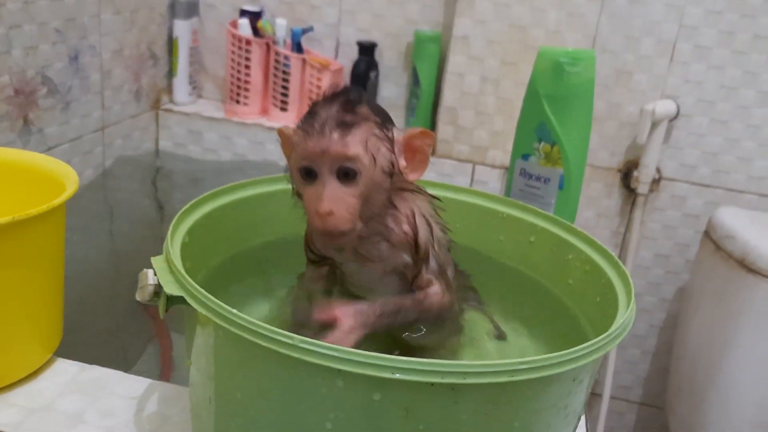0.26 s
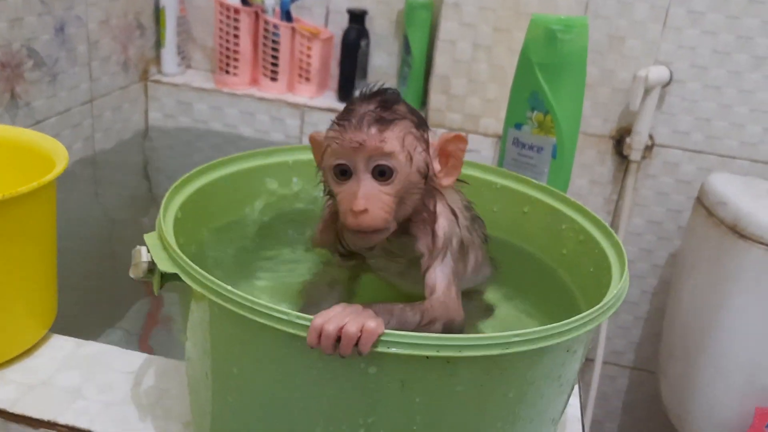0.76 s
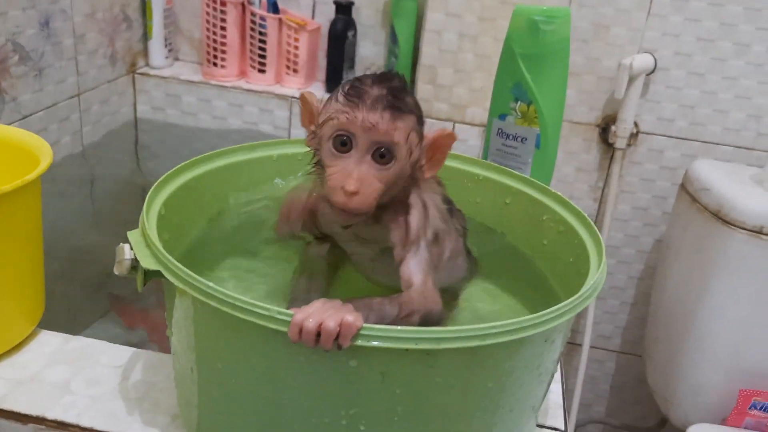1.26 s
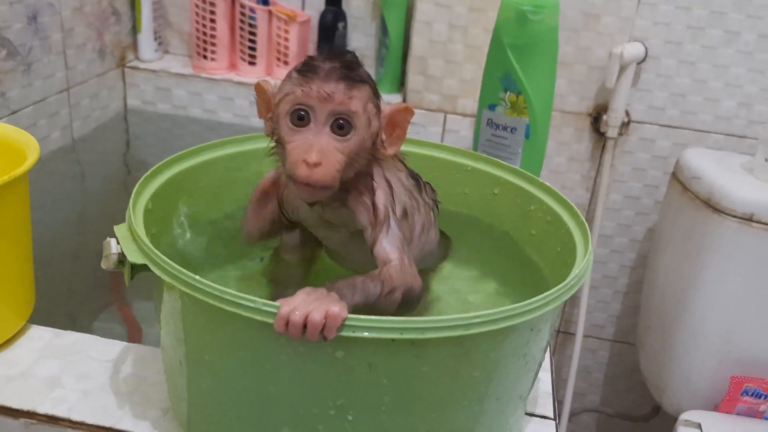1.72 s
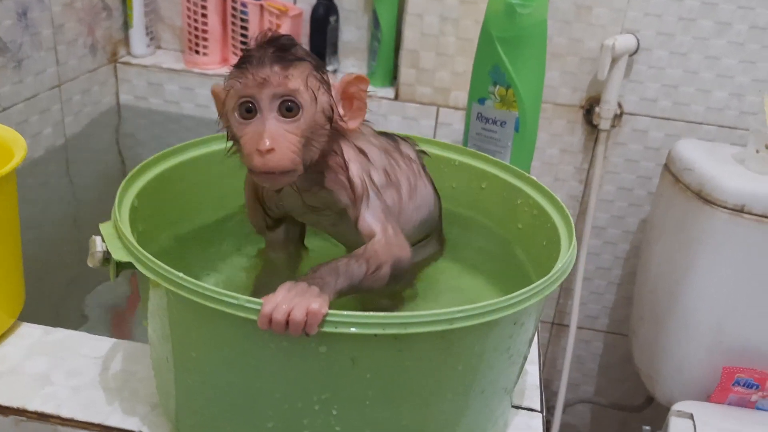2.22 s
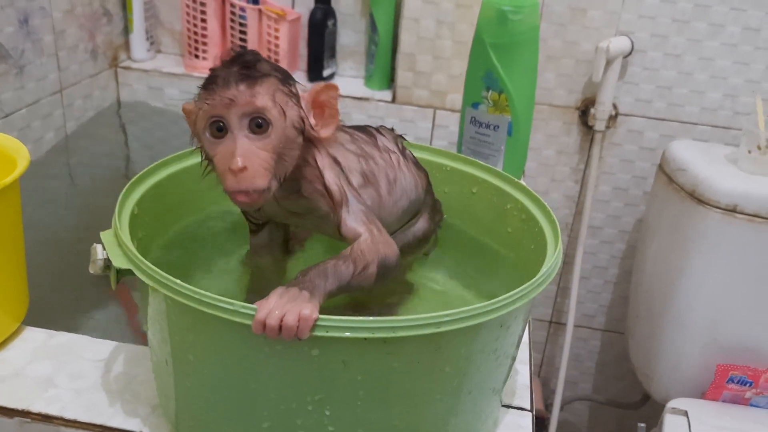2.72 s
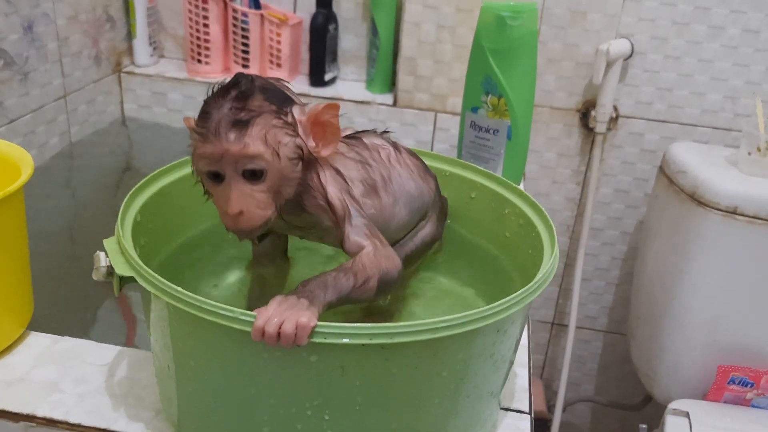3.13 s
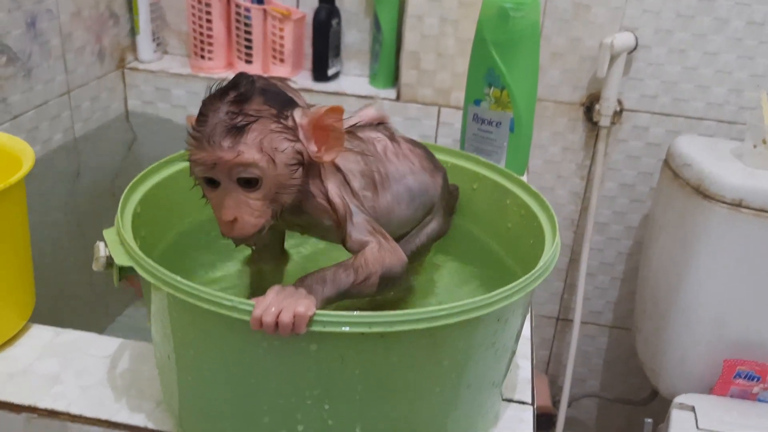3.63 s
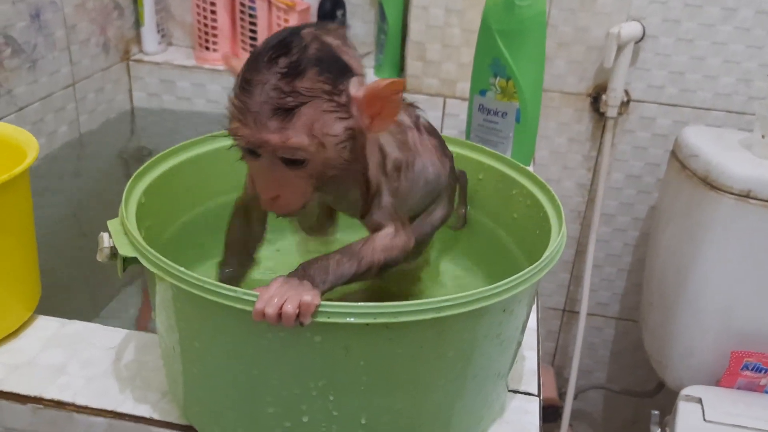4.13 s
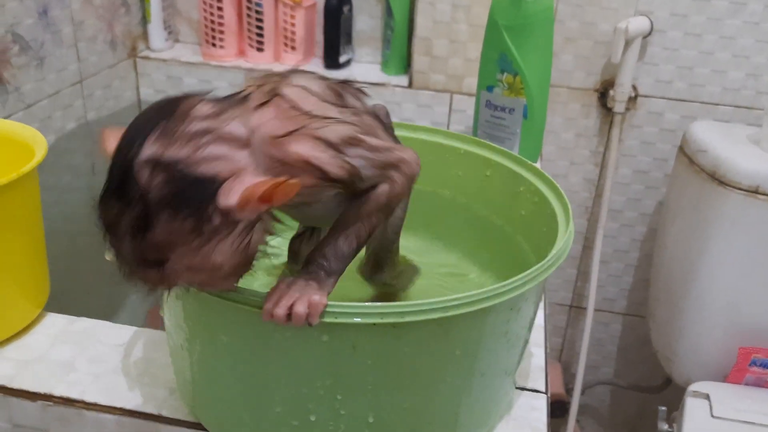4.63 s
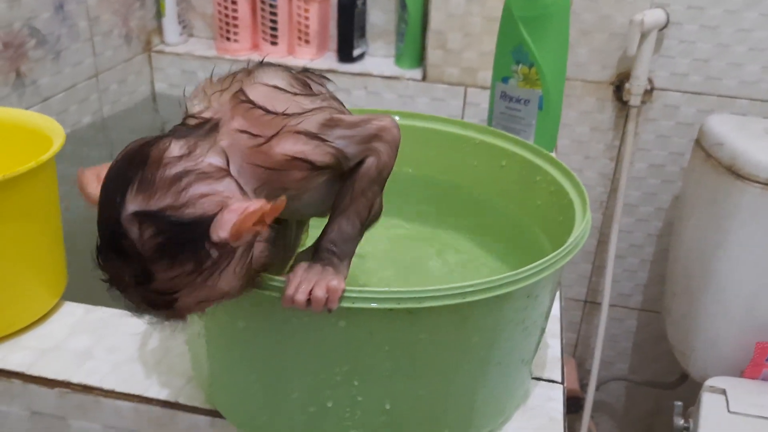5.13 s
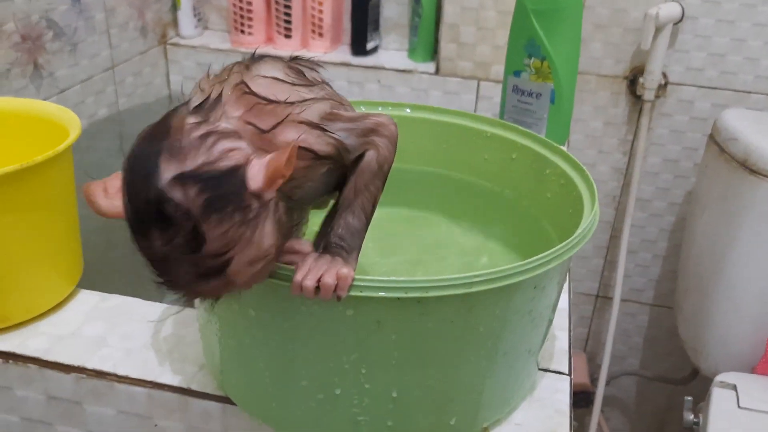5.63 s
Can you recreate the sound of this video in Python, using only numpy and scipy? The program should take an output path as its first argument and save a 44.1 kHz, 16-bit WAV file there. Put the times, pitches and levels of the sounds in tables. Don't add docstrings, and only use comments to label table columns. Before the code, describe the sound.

A small monkey moves in a plastic bucket of water. Strong swishing comes first, then bright bubble pops around one second, softer stirring and dribbles, a sharp wet slap just after four seconds, then near quiet with a very faint high squeak. Hard tiles echo; the microphone is fairly close, pops leaning left, over a low room hum.

```python
import sys
import numpy as np
from scipy import signal
from scipy.fft import irfft
from scipy.io import wavfile

SR = 44100
rng = np.random.default_rng(int(sys.argv[2]) if len(sys.argv) > 2 else 0)


def elevation(decibels):
    levels = np.asarray(decibels, float)
    return 10 ** (levels / 20)


def pcm_store(signal):
    levels = np.round(np.clip(np.atleast_2d(signal), -1, 1) * 32767)
    wavfile.write(sys.argv[1], SR, levels.astype(np.int16).T)


N = 258420

# start_s, rise_s, spray_db,
# fade_db_per_s, stir_depth_db
MOVES = [(-0.1, 0.16, -39.5, 35, -1), (0.03, 0.16, -37.5, 72, -1.5), (0.328, 0.097, -47, 97, -1),
         (0.558, 0.11, -52.5, 60, -4.5), (0.672, 0.011, -47, 25, 1.5), (0.7, .12, -41.5, 16.5, -1),
         (1.2, .11, -42.5, 25, -1.5), (1.38, 0.036, -46.5, 32, -0.5), (1.8, 0.13, -47.5, 50, 0),
         (1.97, 0.072, -49.5, 56, 2.5), (2.12, 0.092, -54.5, 70, 1.5), (2.685, 0.01, -54.5, 44, -4.5),
         (2.72, 0.043, -57, 74, 5), (2.87, 0.16, -56, 20, 1.5), (3.07, 0.17, -52, 44, 1.5),
         (3.36, .16, -50.5, 79, 2), (3.68, 0.061, -58, 50, 2.5), (3.91, 0.12, -53, 42, 1.5),
         (4.46, 0.12, -57, 48, -2.5), (4.9, .03, -59, 47, -0.5), (5.15, 0.15, -61.5, 93, -16),
         (5.46, .04, -65, 200, -3.5), (5.561, 0.04, -48, 72, 2), (5.82, 0.052, -66, 50, 7),
         (1.6, 0.12, -54.5, 23, 3),
    (2.25, 0.057, -56.5, 97, 1),
    (2.58, 0.085, -64, 20, -0.5),
    (4.12, 0.11, -54, 42, 4),
    (4.63, 0.073, -59, 110, -1.5),
    (4.8, .08, -66, 38, -3),
    (5.0, .06, -66, 50, -2),
]
# pitch_hz, level_db (per Hz)
SPRAY_COLOUR = [(210, -33), (350, -6.5), (622, -1.5), (779, -4), (1060, -2), (1280, -5), (1650, 1.5),
                (6530, -3), (9140, -7), (12200, -2.5), (16000, -20.5)]
# start_s, peak_db, pitch_hz, ring_ms, echo_share_db
POPS = [(0.623, -39.5, 3080, 4.3, -7), (0.679, -36, 1200, 9.4, 5.5), (1.109, -22.5, 2770, 18, -4.5),
        (1.185, -32, 2320, 13, -3), (1.315, -27, 1069, 50, 2), (1.319, -35.5, 1073, 100, -1),
        (1.986, -31, 2170, 9.2, -2.5), (2.043, -37.5, 1244, 20, -0.5), (2.687, -54.5, 1190, 16, 8),
        (2.738, -30.5, 3040, 21, -6), (2.897, -37.5, 1040, 14, 3), (3.023, -38.5, 3190, 12, 2.5),
        (4.113, -20, 1920, 10, 2.5), (4.113, -24.5, 3040, 14, -4), (4.526, -49, 2900, 9.9, 4.5),
        (4.707, -50.5, 1270, 20, 4.5), (4.913, -49.5, 2260, 9.8, 3), (5.169, -58, 2800, 12, 1),
        (5.567, -52, 1104, 5.7, 12), (5.719, -48, 1770, 11, 6), (1.9863, -32, 4000, 6.8, -1.5),
        (3.1287, -40, 6000, 6, 5), (5.7394, -45, 7550, 5.6, 4)]
# start_s, peak_db, pitch_hz, echo_share_db
SMALL_POPS = [(1.316, -34, 2310, 0), (1.318, -38, 1650, 0), (2.36, -42.5, 7500, 0.5),
              (2.0, -35.5, 1730, 3.5), (2.688, -45, 10000, -4), (2.35, -55.5, 1280, 0), (2.76, -55, 261, 7),
              (3.023, -45, 3750, 1.5), (3.239, -52.5, 462, 0), (4.113, -34.5, 1300, 2),
              (4.1139, -30, 1690, 2), (4.525, -53, 4000, 5), (4.535, -51, 1280, 3.5), (4.59, -54, 1290, 1),
              (4.745, -54.5, 1300, 4), (4.80, -65, 1270, 6), (4.905, -46, 12000, 4),
              (4.915, -53, 1640, 4.5), (5.087, -48, 11400, 2), (5.62, -52, 390, 4)]
# start_s, peak_db, pitch_hz, echo_share_db
GULPS = [(0.37, -37.5, 2000, 1), (0.4, -36.5, 1320, -2), (0.41, -39, 1490, -7.5), (0.69, -34, 1650, -3),
         (.698, -34, 1570, 3.5), (.71, -39, 980, 4), (4.914, -49, 2800, 0), (4.114, -38, 920, 1.5),
         (4.1145, -29, 1540, 4), (4.114, -37, 2370, 1), (1.108, -34, 2560, -2), (0.37, -42, 1600, -1),
         (0.67, -46, 1900, -4)]
# start_s, peak_db
TEARS = [
    (1.109, -25),
    (1.316, -32),
    (2.688, -46),
    (2.737, -47),
    (4.113, -24),
    (4.912, -52),
    (1.408, -40),
    (2.046, -43),
    (2.184, -48),
    (4.19, -32),
]
# pitch_hz, level_db (per Hz)
SLAP_COLOUR = [(290, -56), (500, -39), (831, -21), (1640, -13), (1840, -3.5), (2430, -18), (3810, -10.5),
               (4210, -26), (4600, -18), (6900, -10), (9090, -25), (13300, -18), (16000, -36)]
# crest_s, level_db, length_s
WAVES = [(0.035, -49, 0.19), (0.208, -47.5, 0.12), (0.36, -60, 0.072), (0.73, -71, 0.056),
         (0.832, -51.5, 0.082), (0.967, -60, 0.11), (1.09, -54, 0.079), (1.315, -58.5, 0.064),
         (1.49, -59.5, 0.12), (1.61, -59, 0.12), (1.82, -65.5, .12), (2.0, -50, 0.092), (2.14, -60, .08),
         (2.245, -62, 0.067), (2.81, -60.5, .07), (3.053, -61.5, 0.14), (3.25, -57.5, 0.072),
         (3.45, -59.5, 0.091), (3.626, -63.5, .1), (3.83, -67.5, .12), (4.12, -67, .12), (4.412, -68, .07),
         (4.73, -68, 0.084), (5.09, -70.5, 0.11), (5.623, -57.5, 0.091), (5.703, -60, 0.069)]
# pitch_hz, width_hz, level_db
BUCKET_AIR = [
    (313.7, 18.6, -0.5),
    (156, 59, -11),
    (385, 25, -8.5),
    (482, 210, -8),
]
# start_s, pitch_hz, level_db
SQUEAKS = [
    [(3.6, 10700, -98), (3.63, 10450, -70), (3.7, 10600, -73), (3.76, 10500, -77.5), (3.84, 10250, -71),
     (3.87, 10300, -95)],
    [(5.35, 11500, -96), (5.38, 12000, -75), (5.44, 13900, -73), (5.48, 15300, -73), (5.505, 15700, -73),
     (5.56, 14400, -74), (5.58, 14200, -95)],
    [(5.35, 9900, -88), (5.38, 10400, -78), (5.44, 11900, -75), (5.48, 12450, -71), (5.505, 12800, -71),
     (5.56, 12050, -75), (5.58, 11900, -95)],
]
# start_s, pitch_hz, level_db
THREAD = [
    (5.15, 2960, -95),
    (5.18, 2920, -75),
    (5.25, 3030, -71.5),
    (5.33, 3100, -68.5),
    (5.45, 3240, -92),
    (5.55, 3300, -95),
]
# pitch_hz, time_to_fall_60_db_s
TILES = [(200, .9), (1000, .7), (2000, .6), (3000, .55), (8000, .6), (15000, .55)]
# pitch_hz, likeness (1 = the same)
LIKENESS = [(60, 0.73), (100, 0.53), (180, 0.48), (310, 0.57), (550, 0.52), (950, 0.18), (1650, -0.098),
            (2860, 0.058), (4970, -0.088), (8640, -0.00025), (15000, -0.038)]
# pitch_hz, left_over_right_db
LEAN = [(60, 3.5), (100, 7.5), (180, 2.5), (310, 1), (550, 5.5), (950, 3), (1650, 3), (2860, 3.5),
        (4970, 0), (8640, 0), (15000, 4)]
# pitch_hz, level_db (per Hz)
HUM_COLOUR = [(15, -41), (25, -3), (123, 7), (223, -17), (309, -8.5), (427, -7), (754, -11), (1370, -4),
              (2220, -8), (2990, -4), (8830, -5), (12200, -4.5), (16000, -25)]
# pitch_hz, level_db (relative)
MOTOR = [
    (167.4, -79.5),
    (119, -77),
]


def in_time(rows):
    s, *columns = np.transpose(rows)
    return [np.interp(np.arange(N) / SR, s, c) for c in columns]


def at_hz(points, hz):
    table_hz, values = np.transpose(points)
    return np.interp(np.log(hz), np.log(table_hz), values)


def rms_one(x):
    return x / np.sqrt(np.mean(x ** 2) + 1e-20)


def drift(rate):
    r = np.exp(-80 * np.pi * rate / SR)
    slow = signal.lfilter([1], [1, -2 * r, r * r], rng.standard_normal(N // 40 + 2002))[2000:]
    return np.interp(np.arange(N) / 40, np.arange(len(slow)), rms_one(slow))


def stereo(mid, side, alike):
    return np.sqrt(1 + alike) * mid + np.sqrt(1 - alike) * side * [[1], [-1]]


def left_right(lean_db):
    return elevation(lean_db / 2 * np.array([[1], [-1]]))


def bands(white):
    edges = 28 * 2 ** np.arange(0, 9.6, .5)
    for k, (low, high) in enumerate(zip(edges, edges[1:])):
        band_filter = signal.butter(2, [low, high], "band", fs=SR, output="sos")
        mid, side = signal.sosfilt(band_filter, white[k % 2])
        hz = np.sqrt(low * high)
        alike = np.clip(at_hz(LIKENESS, hz), -1, 1)
        yield hz, left_right(at_hz(LEAN, hz)) * stereo(mid, side, alike) / np.sqrt(2)


def droplets(per_s, spread_db):
    shape = (2, 2, N)
    size_db = spread_db * np.minimum(rng.exponential(1, shape), 4)
    hits = elevation(size_db) * rng.choice([-1, 1], shape)
    return rms_one(hits * (rng.random(shape) < per_s / SR))


def stirring(depth_share):
    rise_power, settle_s, settle_db_per_s = 0.7, 0.46, 51
    t = np.arange(0, N + 32, 32) / SR
    power = 1e-12
    for s, rise_s, level_db, fade, depth_db in MOVES:
        after = np.maximum(t - s - rise_s, 0)
        loss_db = fade * after + settle_db_per_s * np.maximum(after - settle_s, 0)
        swell = np.clip((t - s) / max(rise_s, .002), 0, 1) ** rise_power
        power = power + (swell * elevation(level_db + depth_share * depth_db - loss_db)) ** 2
    return np.interp(np.arange(N) / SR, t, np.sqrt(power))


def swish(patchy_db):
    layers = np.zeros((3, 2, N))
    for hz, band in bands(droplets(per_s=16000, spread_db=3.0)):
        if hz > 380:
            layer = int(hz < 4500) + int(hz < 1000)
            layers[layer] += elevation(at_hz(SPRAY_COLOUR, hz) + patchy_db * drift(11.2)) * band
    spray, trickle, wash = [rms_one(layer) for layer in layers]
    spray = elevation(3.5) * stirring(0) * spray
    trickle = elevation(1.5) * stirring(0.98) * trickle
    wash = elevation(-14) * stirring(1.2) * wash
    return spray + trickle + wash


def add(track, s, sound):
    i = round(s * SR)
    track[i:i + len(sound)] += sound[:N - i]


def burst(hz, t60, rise=.025, swell_s=.0009):
    t = np.arange(int(.08 * SR)) / SR
    shape = (1 - np.exp(-t / swell_s)) * elevation(-60 * t / t60)
    return shape / shape.max() * np.sin(2 * np.pi * hz * (t + rise * t ** 2 / t60))


def slap():
    size, region, spread_s = 2048, 12, .0055
    bins = np.arange(size // 2 + 1)
    arrival_s = 0.000815 + spread_s * rng.random(len(bins))[bins // region] ** 1.497
    phase = -2 * np.pi * np.cumsum(arrival_s) * SR / size
    colour = elevation(at_hz(SLAP_COLOUR, (bins + 1) * SR / size))
    return elevation(-42) * rms_one(irfft(colour * np.exp(1j * phase)))


def pops():
    direct, sent = np.zeros(N), np.zeros(N)
    crack_db, small_crack_db = -9, -25
    small_ring_ms, ring_slope, gulp_ring_ms = 18, 0.62, 4.9
    events = [(*pop, crack_db) for pop in POPS]
    for s, db, hz, echo_db in SMALL_POPS:
        events.append((s, db, hz, small_ring_ms * (1000 / hz) ** ring_slope, echo_db, small_crack_db))
    for s, db, hz, echo_db in GULPS:
        events.append((s, db, hz, gulp_ring_ms, echo_db, small_crack_db))

    noise = np.diff(rng.standard_normal((57, 400)))
    cracks = noise * elevation(-5.5 - 60 * np.arange(noise.shape[1]) / SR / 0.014)
    for (s, peak_db, hz, ring_ms, echo_db, below_db), crack in zip(events, np.tile(cracks, (2, 1))):
        sound = elevation(peak_db) * burst(hz, max(ring_ms, 1) / 1000)
        sound[:len(crack)] += elevation(peak_db + below_db) * crack
        add(direct, s, sound)
        add(sent, s, elevation(echo_db) * sound)
    for (s, peak_db), crack in zip(TEARS, cracks[::-1]):
        add(direct, s, elevation(peak_db) * crack)
        add(sent, s, elevation(peak_db - 1) * crack)

    blow, slap_s = slap(), 4.1118
    add(direct, slap_s, blow)
    add(sent, slap_s, elevation(5.5) * blow)
    return direct, sent


def rocking():
    build_db, ebb_db = 10, 9.5
    t = np.arange(N) / SR
    power = elevation(-77) ** 2
    for s, level_db, length_s in WAVES:
        lengths = (t - s) / max(length_s, .01)
        power = power + elevation(level_db - np.maximum(ebb_db * lengths, -build_db * lengths)) ** 2
    return np.sqrt(power)


def slosh():
    out = 0
    for hz, width_hz, level_db in BUCKET_AIR:
        r = np.exp(-np.pi * width_hz / SR)
        ring = [1, -2 * r * np.cos(2 * np.pi * hz / SR), r * r]
        mid, side = signal.lfilter([1, 0, -1], ring, rng.standard_normal((2, N)))
        out = out + elevation(level_db) * stereo(rms_one(mid), rms_one(side), alike=.85)
    return rocking() * rms_one(out)


def tone(hz):
    return np.sqrt(2) * np.sin(2 * np.pi * np.cumsum(hz) / SR)


def whistles():
    squeaks = 0
    for hz, db in map(in_time, SQUEAKS):
        squeaks = squeaks + elevation(db + 2.5 * drift(30)) * tone(hz * (1 + .002 * drift(40)))
    hz, db = in_time(THREAD)
    thread = elevation(db + 1 + 3.5 * drift(40)) * tone(hz * (1 + 0.035 * drift(118.4)))
    return squeaks + thread


def bathroom(x):
    echo_db, first_wall_s = -2, 0.0089
    t = np.arange(SR) / SR
    tail = 0
    for hz, band in bands(rng.standard_normal((2, 2, SR))):
        tail = tail + elevation(-60 * t / at_hz(TILES, hz)) * band
    tail *= np.clip(t / first_wall_s - .15, 0, 1)
    tail = elevation(echo_db) * rms_one(tail) / np.sqrt(SR / 4)
    return signal.fftconvolve(x[None], tail, axes=1)[:, :N]


def hum():
    noise = 0
    for hz, band in bands(rng.standard_normal((2, 2, N))):
        noise = noise + elevation(at_hz(HUM_COLOUR, hz) + 3.5 * drift(1.54)) * band
    t = np.arange(N) / SR
    tones = 0
    for hz, db in MOTOR:
        level = elevation(db - 3.5 + 3.2 * drift(0.71))
        tones = tones + level * np.sin(2 * np.pi * hz * t + 2.0 * drift(1.23))
    return elevation(-59.5) * rms_one(noise) + tones


def scene():
    direct, sent = pops()
    thin = whistles()
    near = (direct + thin) * left_right(11)
    near[1] = np.roll(near[1], 9)
    echo = bathroom(sent + elevation(-8) * thin)
    return near + echo + swish(patchy_db=0.97) + slosh() + hum()


def roll_off(x):
    return signal.sosfilt(signal.butter(12, 16790, fs=SR, output="sos"), x)


def record(dry):
    mix = signal.sosfilt(signal.butter(2, 45, "high", fs=SR, output="sos"), dry)
    mix = signal.sosfilt(signal.ellip(12, .5, 70, 15850, fs=SR, output="sos"), mix)
    return roll_off(mix)


dry = scene()
out = record(dry)
pcm_store(out)
```